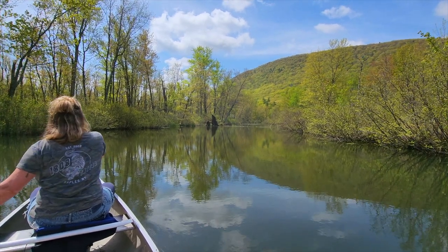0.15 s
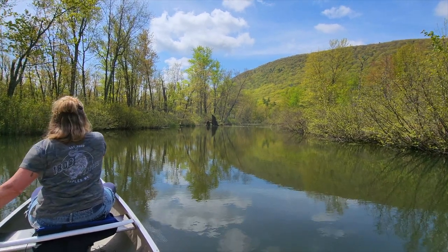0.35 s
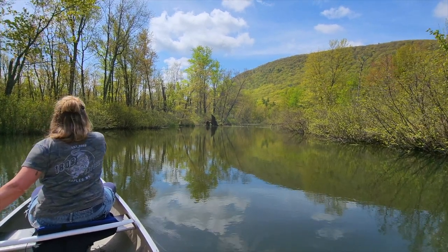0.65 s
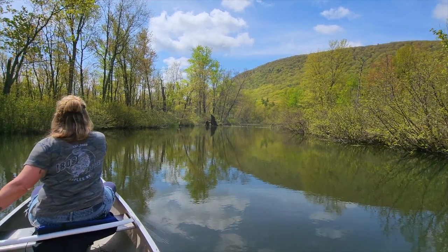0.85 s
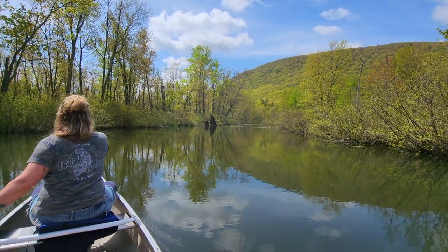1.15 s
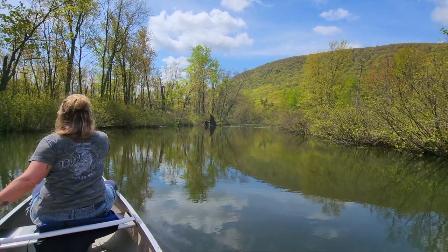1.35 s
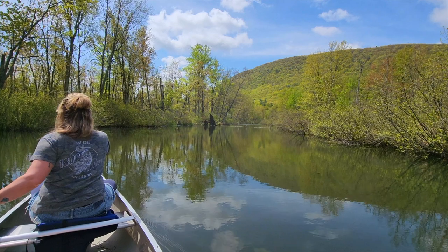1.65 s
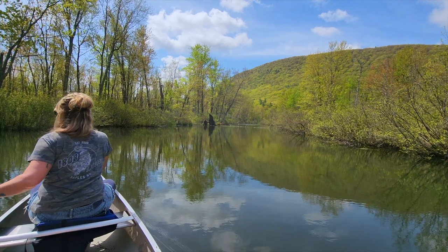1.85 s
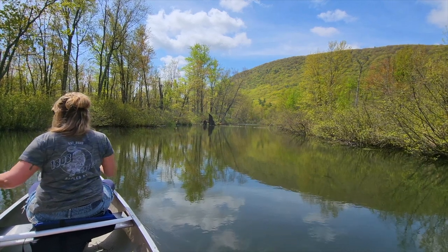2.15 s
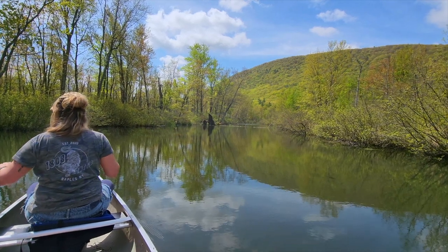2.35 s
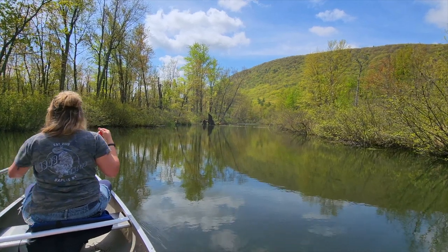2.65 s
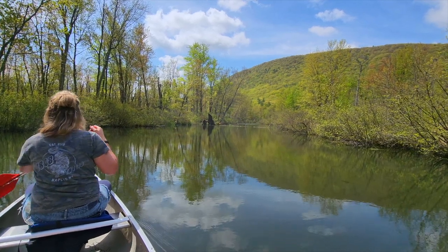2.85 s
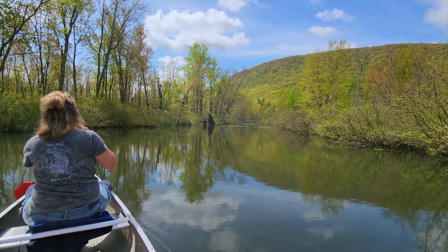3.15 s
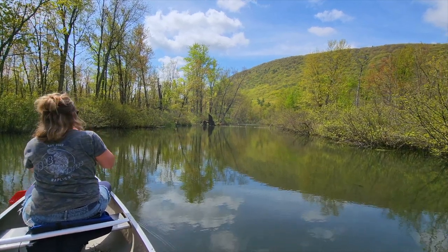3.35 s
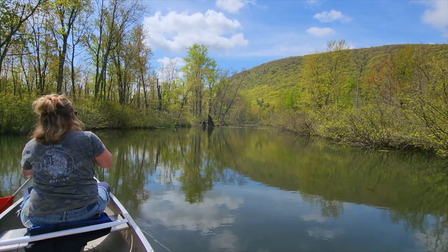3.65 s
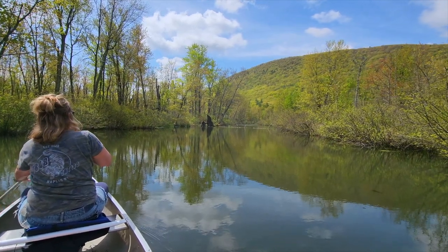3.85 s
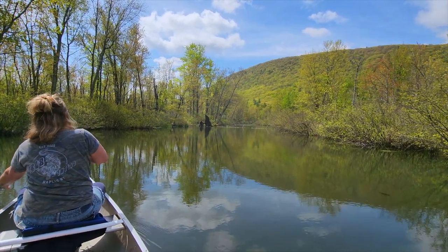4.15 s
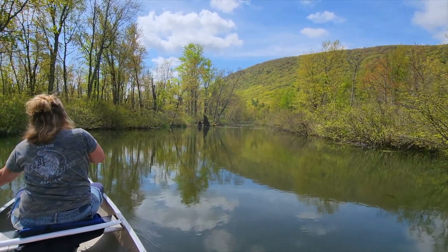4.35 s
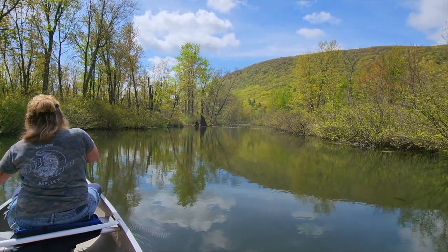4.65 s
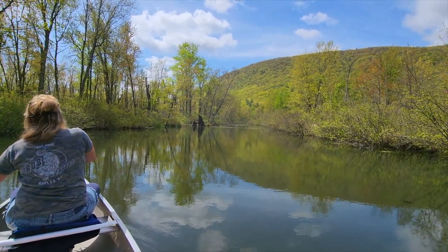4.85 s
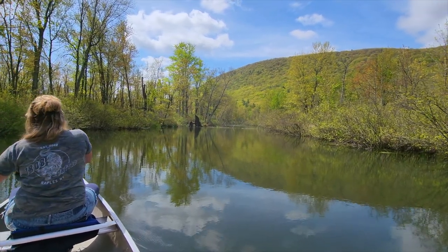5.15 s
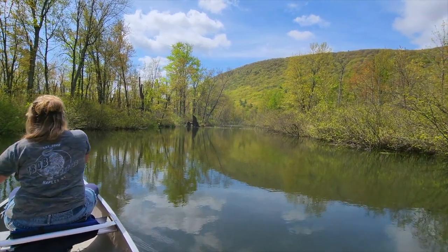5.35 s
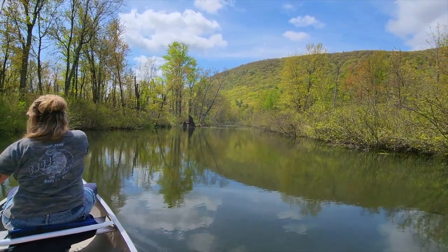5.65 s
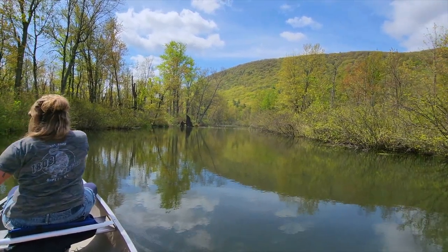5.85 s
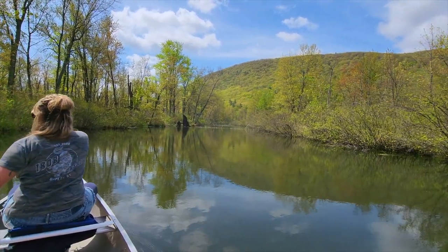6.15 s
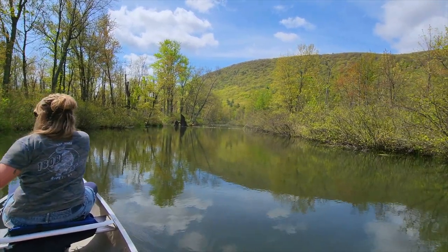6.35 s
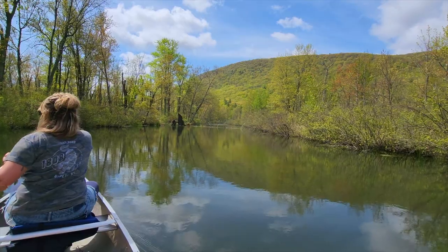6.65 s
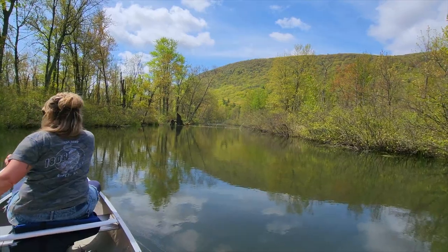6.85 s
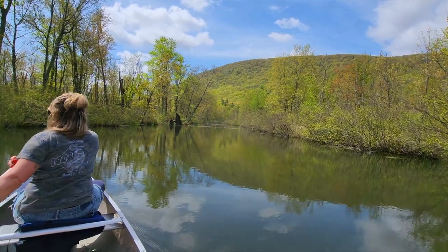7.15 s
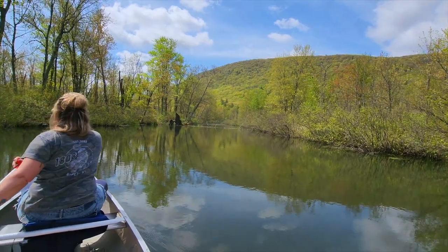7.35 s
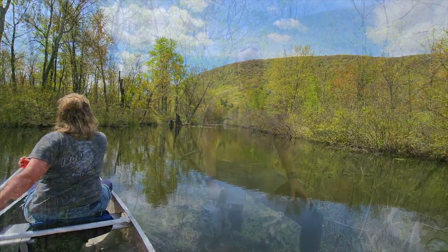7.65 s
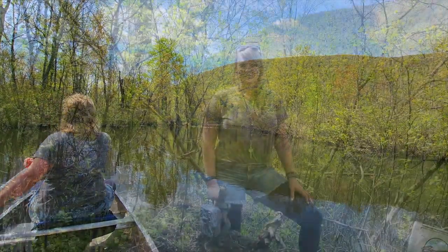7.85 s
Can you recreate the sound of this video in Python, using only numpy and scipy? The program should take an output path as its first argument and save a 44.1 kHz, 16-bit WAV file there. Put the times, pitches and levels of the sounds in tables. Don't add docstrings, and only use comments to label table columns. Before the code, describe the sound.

Outdoors on calm marsh water in a canoe. Faint distant whistles over soft leaf hush, then a close sparrow gives four sharp chips with thin high seeps, buzzes, rasps and a short trill. Water drips and paddle ticks follow. A blackbird trills and chucks, small birds chatter, and a warbler sings quick falling pairs. Low wind rumble swells and flutters on the open stereo microphone towards the end.

```python
import sys
import numpy as np
from scipy import signal
from scipy.fft import rfft, irfft, next_fast_len
from scipy.io import wavfile

SR = 44100
rng = np.random.default_rng(int(sys.argv[2]) if len(sys.argv) > 2 else 0)


def file_out(sig):
    cols = np.atleast_2d(sig).T
    lim = np.clip(cols, -1, 1)
    pcm = np.round(lim * 32767).astype(np.int16)
    wavfile.write(sys.argv[1], SR, pcm)


def voltage_ratio(decibels):
    exponent = np.asarray(decibels, float) / 20
    return 10 ** exponent


N = 353108


def rms_one(x):
    return x / np.sqrt(np.mean(x ** 2) + 1e-20)


def sides(pan_db):
    return voltage_ratio([[pan_db / 2], [-pan_db / 2]])


def in_time(rows):
    s, *columns = np.transpose(rows)
    return [np.interp(np.arange(N) / SR, s, c) for c in columns]


def at_hz(points, hz):
    point_hz, value = np.transpose(points)
    return np.interp(np.log(hz), np.log(point_hz), value)


def bandpass(x, order, low_hz, high_hz):
    return signal.sosfilt(signal.butter(order, [low_hz, high_hz], "band", fs=SR, output="sos"), x)


def drift(rate_hz):
    r = np.exp(-80 * np.pi * rate_hz / SR)
    white = rng.standard_normal(N // 40 + 2002)
    slow = signal.lfilter([1], [1, -2 * r, r * r], white)[2000:]
    return np.interp(np.arange(N) / 40, np.arange(len(slow)), rms_one(slow))


def add(track, s, sound):
    at = round(s * SR)
    track[..., at:at + sound.shape[-1]] += sound[..., :N - at]


def whistles(notes, edge=0.13, overtone_db=-62, rough=0.19, fade_db=0):
    out = np.zeros(N)
    for s, length_s, start_hz, mid_hz, end_hz, db in notes:
        u = np.linspace(0, 1, round(length_s * SR))
        hz = start_hz * (1 - u) * (1 - 2 * u) + 4 * mid_hz * u * (1 - u) + end_hz * u * (2 * u - 1)
        phase = 2 * np.pi * (np.cumsum(hz) / SR + rng.random())
        shape = signal.windows.tukey(len(u), np.clip(edge, .05, 1)) * voltage_ratio(fade_db * u)
        tone = np.sin(phase) + voltage_ratio(overtone_db) * np.sin(2 * phase)
        add(out, s, voltage_ratio(db + 3.5) * shape * tone)
    return out * (1 + rough * drift(99))


def trills(rows, per_s, duty, rough, uneven_db=-0.9, detuned=0.014):
    notes = []
    for s, end_s, start_hz, end_hz, db in rows:
        starts_s = np.arange(s, end_s, 1 / per_s)
        for at_s, (wobble, detune, late) in zip(starts_s, rng.standard_normal((len(starts_s), 3))):
            swell_db = -5 * ((at_s - s) / (end_s - s)) ** 3 - 7 * np.exp(-(at_s - s) / 0.0014)
            bend = 1 + detuned * detune
            pitches_hz = start_hz * bend, (start_hz + end_hz) / 2 * bend, end_hz * bend
            level_db = db + swell_db + uneven_db * wobble
            notes.append((at_s + .025 * late / per_s, duty / per_s, *pitches_hz, level_db))
    return whistles(notes, edge=0.45, rough=rough)


def glides(rows, early):
    return [(s, length_s, a, a + early * (b - a), b, db) for s, length_s, a, b, db in rows]


def held(rows, droop=0.95):
    return [(s, length_s, droop * hz, hz, droop * hz, db) for s, length_s, hz, db in rows]


def repeated(length_s, syllable, rows):
    return [(s, length_s, *syllable[:-1], syllable[-1] + db) for s, db in rows]


def sparrow():
    # chip t/s, strength/dB, seep f/Hz, seep length/s
    opening = [
        (1.312, -11, 7520, 0.11),
        (1.661, -3, 7330, 0.072),
        (1.897, -3, 7400, 0.0725),
        (2.127, -3.5, 7310, 0.07),
    ]
    # start f/Hz, middle f/Hz, end f/Hz, level/dB
    chip = (5250, 4680, 3550, -50)
    # start f/Hz, end f/Hz, level/dB
    burr = (2380, 2670, -65)
    # t/s, length/s, start f/Hz, end f/Hz, level/dB
    falls = [
        (2.688, .0086, 6500, 4470, -61),
        (2.748, .011, 5980, 4070, -54),
        (2.838, .015, 2770, 2180, -69),
    ]
    rises = [
        (2.52, 0.01, 5960, 6450, -69),
        (2.522, 0.017, 4610, 4820, -60.5),
        (2.525, 0.043, 2284, 2604, -63.5),
        (2.545, 0.02, 2410, 3170, -60),
        (2.559, 0.045, 3072, 3280, -64.5),
        (2.714, 0.017, 4730, 5870, -59.5),
        (2.806, 0.0068, 2250, 3080, -65.5),
    ]
    late_seeps = [
        (2.645, 0.027, 8330, 7480, -70),
        (2.666, 0.015, 7500, 7390, -59.5),
        (5.64, 0.03, 7900, 7450, -89),
    ]
    # t/s, length/s, f/Hz, level/dB
    level_notes = [
        (2.722, 0.034, 5860, -54.5),
        (2.75, 0.057, 5790, -56.5),
    ]
    far_seeps = [
        (6.035, .035, 7500, -77.5),
        (6.205, 0.038, 7570, -79),
        (6.375, .037, 7440, -80),
    ]
    # start t/s, end t/s, start f/Hz, end f/Hz, level/dB
    buzz_up = [
        (2.2455, 2.47, 4250, 5400, -57),
        (2.292, 2.46, 8700, 9500, -92),
    ]
    buzz_down = [
        (2.247, 2.44, 4200, 3450, -57.5),
    ]
    high_burr = [
        (2.606, 2.64, 5800, 6940, -67.5),
    ]
    rasp = [
        (2.9, 3.055, 4500, 5480, -57),
        (2.9, 3.02, 7600, 9400, -87.5),
        (2.902, 3.05, 3700, 4200, -67),
        (2.9, 3.06, 5100, 7500, -78),
    ]
    lower_rasp = [
        (2.898, 3.035, 3590, 3860, -60),
    ]
    closing = [
        (3.244, 3.43, 2560, 2380, -64),
    ]
    # t/s, length/s, start f/Hz, middle f/Hz, end f/Hz, level/dB
    big_fall = [
        (3.147, 0.013, 7700, 7180, 6470, -61),
        (3.156, 0.022, 6770, 5700, 3560, -51.5),
    ]

    chips = repeated(.013, chip, [(s, db) for s, db, *_ in opening])
    seeps = [(s + .033, length_s, 0.98 * hz, hz, hz, db - 51.5) for s, db, hz, length_s in opening]
    burrs = [(s - .096, s - .096 + .059, *burr) for s, *_ in opening]
    notes = glides(falls, early=.42) + glides(rises, early=0.59) + held(level_notes, droop=0.98)
    seeps = seeps + glides(late_seeps, early=0.8) + held(far_seeps)
    buzz_per_s, rasp_per_s = 64.1, 183
    buzz = trills(buzz_up, buzz_per_s, duty=0.34, rough=0.12, detuned=0.0082)
    buzz = buzz + trills(high_burr, 147, duty=0.34, rough=0.12, detuned=0.0082)
    return [(whistles(notes, edge=0.62, rough=0.37, overtone_db=-50), -6, -11, -3.5),
            (voltage_ratio(3) * whistles(chips, edge=0.79, rough=0.2, fade_db=-3.5), -6, -11, -4.5),
            (buzz, -6, -11, 0.3),
            (trills(buzz_down, buzz_per_s, duty=0.51, rough=0.13, detuned=0.0092), -4, -11, .6),
            (trills(rasp, rasp_per_s, duty=0.88, rough=0.14, detuned=0.026), -6, -11, -2.5),
            (whistles(big_fall, edge=0.51, rough=0.2), -5, -11, 1.5),
            (trills(lower_rasp, rasp_per_s, duty=0.98, rough=0.17, detuned=0.015), -4, -11, -6.0),
            (trills(closing, 70.8, duty=0.43, rough=0.16), -3, -11, -6),
            (whistles(seeps, edge=0.49), -8, -11, -1.5),
            (trills(burrs, 163, duty=0.96, rough=0.46), -3, -11, -6)]


def chucks(breath=1.0):
    # t/s, length/s, top f/Hz, level/dB
    calls = [
        (5.181, 0.041, 480, -55),
        (5.338, 0.034, 680, -54.5),
        (5.551, .031, 700, -54.5),
        (5.9, 0.038, 580, -56.5),
        (4.43, 0.03, 1200, -75),
    ]
    # f/Hz, level/dB
    throat = [(1700, -13), (2300, -3), (3000, -1.5), (3700, -4.5), (4400, 3), (5500, -2), (6300, -12),
              (6900, -25), (9000, -21), (10500, -51.5)]
    out = np.zeros(N)
    for s, length_s, top_hz, db in calls:
        u = np.linspace(0, 1, round(length_s * SR))
        phase = 2 * np.pi * np.cumsum(top_hz * (1 - 0.426 * (u - .4) ** 2)) / SR
        stack = 0
        for k in range(3, 18):
            stack = stack + voltage_ratio(at_hz(throat, k * top_hz)) * np.sin(k * phase + 6.28 * rng.random())
        rasp = np.convolve(rng.standard_normal(len(u)), np.hanning(40), "same")
        voice = rms_one(stack * (1 + breath * rms_one(rasp)))
        add(out, s, voltage_ratio(db) * np.hanning(len(u)) ** 0.17 * voice)
    return out


def blackbird():
    # t/s, length/s, start f/Hz, end f/Hz, level/dB
    slow_glides = [
        (4.162, 0.09, 2350, 2480, -77.5),
        (4.166, .15, 2667, 2746, -73.5),
        (4.47, 0.085, 1850, 1780, -71.5),
        (4.577, 0.028, 1530, 1380, -65),
        (4.72, 0.035, 3250, 3330, -82),
        (5.066, 0.3, 1745, 1890, -77),
        (5.637, 0.24, 1676, 1894, -77),
    ]
    # t/s, length/s, f/Hz, level/dB
    level_notes = [
        (4.206, .099, 1470, -83),
        (4.29, .3, 2720, -78),
        (4.687, .038, 1635, -81),
        (4.8, .72, 2740, -79),
    ]
    # start t/s, end t/s, start f/Hz, end f/Hz, level/dB
    trill = [
        (4.797, 5.6, 2816, 2645, -72),
        (4.797, 5.44, 3644, 2950, -77),
        (4.797, 5.44, 4100, 3500, -81.5),
        (4.797, 5.5, 4860, 4390, -76),
        (4.797, 5.5, 5580, 5060, -77.5),
        (4.7, 4.95, 2360, 2050, -78),
    ]
    gulp = [
        (4.626, 4.67, 2380, 2040, -56.5),
        (4.754, 4.783, 4200, 3270, -61),
        (4.754, 4.783, 4820, 4320, -57),
        (4.754, 4.772, 5500, 5070, -62),
    ]
    # t/s, length/s, start f/Hz, middle f/Hz, end f/Hz, level/dB
    arches = [
        (5.343, 0.02, 2600, 3085, 2600, -60.5),
        (5.553, 0.019, 2460, 2940, 2300, -63),
        (5.902, .022, 2350, 2840, 2253, -66),
    ]
    song = whistles(glides(slow_glides, early=.65) + held(level_notes), edge=0.2, rough=0.32)
    song = song + trills(trill, 66.7, duty=0.92, rough=0.27, uneven_db=1.0, detuned=.016)
    return [(song, 2.5, 14, .6),
            (trills(gulp, 170, duty=1.0, rough=0.26), 3, 14, -8),
            (chucks() + whistles(arches, edge=0.69, overtone_db=-13), 3, 14, -5)]


def warbler():
    # t/s, gap to fall/s, hook strength/dB, fall strength/dB
    pairs = [
        (6.062, 0.026, -4.5, -2.5),
        (6.232, 0.044, -1.5, -0.5),
        (6.404, 0.038, -1.5, -0.5),
        (6.572, 0.038, -0.5, -3),
    ]
    # start f/Hz, middle f/Hz, end f/Hz, level/dB
    hook = (5300, 3700.5, 4599, -66.5)
    fall = (4449, 3099, 2149, -67)
    # t/s, length/s, start f/Hz, end f/Hz, level/dB
    ending = [
        (6.751, 0.012, 5600, 4570, -69),
        (6.761, 0.015, 3730, 2880, -67.5),
        (6.882, 0.017, 5700, 5000, -74.5),
        (6.898, 0.017, 4000, 2900, -67.5),
        (7.006, 0.034, 2920, 4420, -68.5),
        (7.036, 0.017, 4290, 2830, -66),
    ]
    # t/s, length/s, f/Hz, level/dB
    dots = [
        (6.066, .014, 2530, -67.5),
        (6.134, 0.013, 2550, -60),
    ]
    notes = repeated(.026, hook, [(s, db) for s, _, db, _ in pairs])
    notes += repeated(.056, fall, [(s + gap_s, db) for s, gap_s, _, db in pairs])
    song = whistles(notes, edge=0.64, rough=0.5)
    echo_s, echo_db = .011, -5
    return [(whistles(held(dots), edge=0.6), 0.5, -24, -14),
            (whistles(glides(ending, early=0.53), edge=0.38, rough=0.3), 0.5, -24, -7),
            (song + voltage_ratio(echo_db) * np.roll(song, round(echo_s * SR)), 0.5, -24, -4)]


def far_birds():
    # start f/Hz, middle f/Hz, end f/Hz, level/dB
    slur = (7253, 6296, 4598, -70.5)
    slur_strengths_db = [0, 1.5, 4, 2, 0.5, 0.5]
    # start t/s, end t/s, start f/Hz, end f/Hz, level/dB
    chatter = [
        (5.6, 5.71, 4950, 4050, -73),
        (5.76, 5.9, 5200, 4150, -69.5),
        (5.94, 6.07, 5600, 3770, -70),
    ]
    # t/s, length/s, start f/Hz, end f/Hz, level/dB
    slides = [
        (4.14, .035, 5950, 6950, -72),
        (4.553, .035, 6250, 6980, -71),
        (4.588, .09, 7050, 6650, -81),
        (5.272, .15, 4590, 4520, -61),
        (5.41, .055, 4520, 4500, -67),
        (5.864, .026, 4780, 5900, -77),
    ]
    # t/s, length/s, f/Hz, level/dB; the 2.53 s and 2.59 s rows carry on the sparrow's rises
    faint_held = [(.43, .02, 2500, -80), (2.59, 0.2, 3150, -73.5), (2.9, .12, 2620, -78),
                  (6.42, 0.039, 4580, -77), (6.549, 0.04, 2940, -78), (6.598, .1, 4600, -80),
                  (6.8, 0.032, 2300, -77), (6.92, .06, 2300, -73), (7.028, .05, 4343, -74),
                  (7.07, 0.14, 4330, -79), (2.53, .07, 4350, -71), (7.72, 0.26, 3650, -92),
                  (7.915, .015, 2050, -73)]
    # t/s, length/s, start f/Hz, middle f/Hz, end f/Hz, level/dB
    faint_bends = [(.04, 0.065, 3820, 3870, 3880, -80), (.115, 0.11, 3780, 3660, 3660, -80),
                   (0.22, .045, 3300, 3700, 3800, -82), (.02, .1, 3900, 4200, 4100, -86),
                   (.265, .03, 4500, 4000, 4540, -83), (1.14, .15, 4150, 4030, 3960, -84),
                   (1.5, .035, 4700, 3700, 4170, -78), (1.44, 0.1, 3900, 3600, 3530, -80.5),
                   (4.592, .006, 4700, 4400, 4300, -75), (4.449, .01, 3300, 3500, 4300, -74),
                   (1.53, 0.12, 4000, 3760, 3560, -77.5), (1.9, 0.18, 3300, 3800, 3510, -81),
                   (5.712, 0.027, 5900, 7200, 4400, -67), (6.1, .012, 4200, 4120, 4600, -67),
                   (5.95, .028, 4500, 5250, 5600, -71), (5.785, 0.011, 5200, 7000, 7300, -81)]
    first_s, every_s = 4.685, .0983
    slurs = repeated(.013, slur, [(first_s + k * every_s, db) for k, db in enumerate(slur_strengths_db)])
    faint = held(faint_held, droop=0.94) + faint_bends
    return [(voltage_ratio(7) * whistles(slurs, edge=0.6, rough=0.3, fade_db=-10), 3, 10, -9),
            (trills(chatter, 95, duty=0.6, rough=0.3, uneven_db=1.0, detuned=.04), -1.5, 14, 1.5),
            (whistles(glides(slides, early=.8), edge=0.36, rough=0.2), 3, 10, -7),
            (voltage_ratio(-2.0) * whistles(faint, edge=0.35, rough=0.65), 0.5, 10, -2.5)]


def chorus():
    # t/s, level/dB
    swell = [(4.7, -99), (4.85, -76.5), (5.55, -68), (5.75, -64.5), (6.1, -68), (6.6, -69.5), (7.3, -78),
             (7.6, -81), (7.75, -102)]
    when, pitch, strength = rng.random((500, 3)).T
    top_hz = 3900 + 1900 * pitch
    length_s = np.full(500, .02)
    notes = np.column_stack([4.7 + 3.1 * when, length_s, top_hz, top_hz - 300, top_hz - 700, 8 * strength])
    return voltage_ratio(in_time(swell)[0] - 5.5) * rms_one(whistles(notes, edge=0.95)) * np.sqrt(3.1 * SR / N)


def hidden_birds():
    # t/s, length/s, start f/Hz, end f/Hz, level/dB
    rows = [
        (0.0, 0.018, 4620, 3310, -73.5),
        (.12, .02, 4500, 3190, -72),
        (.26, 0.021, 4730, 3290, -76),
        (1.2, .02, 3590, 2880, -74.5),
        (1.45, .02, 4300, 3070, -77),
        (1.56, 0.021, 4200, 3180, -74),
        (1.32, .03, 5000, 3900, -69),
        (5.6, 0.032, 4050, 5700, -66.5),
        (5.68, .03, 5900, 4030, -65),
    ]
    return whistles(glides(rows, early=.5), edge=0.5)


def banks(x):
    # f/Hz, level/dB
    scatter = [(1500, -1), (2500, -0.5), (3500, 2.5), (5000, 1.5), (8000, -0.5)]
    # f/Hz, T60/s
    decay = [(1500, 1.6), (3000, 1.13), (5000, 0.94), (8000, 1.07)]
    t, response = np.arange(SR) / SR, 0
    white = rng.standard_normal((2, SR))
    edges_hz = 1000 * 2 ** np.arange(0, 4.1, .5)
    for low_hz, high_hz in zip(edges_hz, edges_hz[1:]):
        hz = np.sqrt(low_hz * high_hz)
        gain = voltage_ratio(at_hz(scatter, hz) - 60 * t / at_hz(decay, hz))
        response = response + bandpass(white, 2, low_hz, high_hz) * gain
    burst, far_bank = 1.1 * np.exp(-t / 0.02), 0.077 * np.exp(-((t - .09) / 0.043) ** 2)
    response = response * (1 - np.exp(-t / 0.002)) * (1 + burst + far_bank)
    response = response / np.sqrt(np.sum(response ** 2) / 2)
    sway_s, sway_rate_hz = 4e-5, 25
    x = np.interp(np.arange(N) + sway_s * SR * drift(sway_rate_hz), np.arange(N), x)
    return signal.fftconvolve(x[None], response * sides(-0.6), axes=1)[:, :N]


def birds():
    direct = np.zeros((2, N))
    scattered = chorus() + hidden_birds()
    for song, pan_db, lag, wet_db in sparrow() + blackbird() + warbler() + far_birds():
        direct += sides(pan_db) * [np.roll(song, lag), song] / np.sqrt(2)
        scattered += voltage_ratio(wet_db) * song
    return direct + banks(scattered) / np.sqrt(2)


def drops(cycles=38, rise=0.0035):
    # t/s, peak level/dB, f/Hz, left-right/dB
    rows = [(0.079, -61, 1980, -7), (0.688, -71, 5300, -22), (3.1899, -40, 2500, -8),
            (3.1939, -45, 2900, -8), (3.2023, -48.5, 2570, 9), (3.1905, -68, 8500, 18),
            (3.207, -64, 8300, 18), (2.9, -69, 7900, 9), (6.128, -66, 1950, -2), (6.748, -68, 2100, -5),
            (6.021, -68, 7300, 5), (4.446, -48.5, 2230, -6), (6.189, -54, 2230, -6),
            (6.272, -64.5, 2000, -3), (6.336, -60, 2140, -6.0), (6.4536, -59, 2060, -2.5),
            (7.1724, -62, 1760, -11), (7.19, -67, 1650, -12), (7.5966, -74.5, 1900, -14),
            (7.7815, -65.5, 4870, -25)]
    out, t = np.zeros((2, N)), np.arange(SR // 20) / SR
    for s, db, hz, pan_db in rows:
        decay = voltage_ratio(-60 * t * hz / cycles) * (1 - np.exp(-t * hz * 2.1)) ** 2
        ring = decay * np.sin(2 * np.pi * hz * t * (1 + rise * t * hz))
        add(out, s, voltage_ratio(db) * ring / np.max(decay) * sides(pan_db))
    return out


def ticks(rows, low_hz, high_hz, lift_db, t60_s=0.008):
    out, t = np.zeros((2, N)), np.arange(SR // 40) / SR
    for s, db, pan_db in rows:
        snap = rng.standard_normal(len(t)) * voltage_ratio(-60 * t / t60_s)
        add(out, s, voltage_ratio(db + lift_db) * snap * sides(pan_db))
    return bandpass(out, 2, low_hz, high_hz)


def hull():
    # t/s, peak level/dB, left-right/dB
    dry_ticks = [(1.3179, -88, -5), (1.8826, -89, 8), (2.2147, -86, 8), (2.362, -76, 11), (2.369, -62.5, 9),
                 (2.4043, -80, 5.5), (2.534, -82, 4), (2.4369, -72, 5), (2.4676, -62.5, 14),
                 (2.5005, -80, 10.5), (2.5688, -72, 19), (2.6, -75, 14), (2.6673, -74, 14),
                 (2.685, -76, 13), (3.035, -75, -12), (3.19, -68, 18), (3.205, -66, 21), (3.2194, -74, 13),
                 (3.4411, -82, 3), (3.7244, -87, 14), (4.4463, -73, 13), (4.5572, -84, 5.5),
                 (5.999, -81, 0), (6.0344, -92, 5), (6.9303, -76, 11), (7.2927, -87, 3), (7.4475, -79, -4),
                 (7.4889, -87, -8), (7.5378, -82, -9), (7.5613, -78, -7), (7.6344, -79, 2),
                 (7.6844, -82, -11)]
    dull_ticks = [(4.5924, -69, -4.5), (5.9985, -58, -12), (6.0344, -63, -7.0), (6.9292, -60, -14.5),
                  (7.1514, -67, -8.0), (7.2914, -69, -9.5), (7.4014, -72, -10.5), (7.4889, -68, -10),
                  (7.5616, -68, -10), (7.598, -66.5, -19), (7.6644, -68, -11), (7.8394, -79, -7.5)]
    bright = ticks(dry_ticks, 7000, 9200, lift_db=6.5) + ticks(dry_ticks, 11000, 15000, lift_db=-8)
    return bright + ticks(dull_ticks, 3800, 6630, lift_db=4.0)


def high_grains():
    # t/s, level/dB
    grain_level = [(2.1, -125), (2.2, -100), (2.45, -97), (2.7, -104), (3.0, -102), (3.2, -101), (3.35, -125)]
    grains_per_s = 500
    struck = rng.random((2, N)) < grains_per_s / SR
    size = voltage_ratio(2.5 * np.minimum(rng.exponential(1, N), 4))
    grains = struck * size * rng.choice([-1, 1], N)
    bright = bandpass(grains + 1e-18, 3, 9000, 15500)
    return voltage_ratio(in_time(grain_level)[0]) * rms_one(bright) * sides(6)


def banded_noise(spectrum, alike, patchy_db, flicker_hz):
    out, together = 0, drift(flicker_hz / 3)
    first_hz, last_hz = spectrum[0][0], spectrum[-1][0]
    edges_hz = first_hz * 2 ** np.arange(0, np.log2(last_hz / first_hz) + .3, .5)
    white = rng.standard_normal((2, 2, N))
    for k, (low_hz, high_hz) in enumerate(zip(edges_hz, edges_hz[1:])):
        mid, side = bandpass(white[k % 2], 2, low_hz, high_hz)
        hz = np.sqrt(low_hz * high_hz)
        share = np.clip(at_hz(alike, hz), -.99, .99)
        gain = voltage_ratio(at_hz(spectrum, hz) + patchy_db * (0.89 * together + drift(flicker_hz)))
        out = out + gain * (np.sqrt(1 + share) * mid + np.sqrt(1 - share) * side * [[1], [-1]])
    return rms_one(out)


def wind():
    # t/s, level under 160 Hz/dB, left-right/dB
    gusts = [(0, -57.5, 3), (.55, -58.5, 3.5), (.92, -50, 8), (1.3, -60, 2), (1.75, -68, -0.5),
             (3.45, -69, 1), (3.95, -58, 3.5), (4.4, -67, -2.5), (5.0, -61, 1), (5.45, -62, 2.5),
             (5.72, -57.5, -0.5), (5.95, -47.5, -1), (6.35, -51.5, -1), (6.85, -49, -2.3), (7.6, -45, -1),
             (8.01, -56.5, 2)]
    # t/s, rise/dB
    buffets = [(.31, 8), (.49, 7.5), (5.061, 9), (5.79, 5), (6.37, -6.5), (6.92, -4), (7.14, -3.5),
               (7.3, -5.5), (7.56, 0.5), (5.91, 6.5), (6.019, 10), (6.141, 2), (6.201, 4), (6.49, 9.5),
               (6.59, 1), (6.739, 5), (6.858, 8), (6.97, 8), (7.05, 5.5), (7.2, 8.5), (7.39, 3),
               (7.509, -2), (7.631, 1), (7.8, 5.5), (7.921, 3.5)]
    # f/Hz, level per Hz/dB
    rumble_spectrum = [(20, -15), (35, 1), (55, 7), (85, 4), (115, -4), (160, -11.5), (230, -34)]
    flutter_spectrum = [(150, 4), (220, -3.5), (320, -26), (450, -43), (620, -58)]
    # f/Hz, likeness/1
    likeness = [(25, .78), (60, .62), (160, .2)]
    # t/s, peak level/dB
    cover_flaps = [(5.902, -53), (5.998, -50), (6.094, -47), (6.418, -53), (6.48, -47.5), (6.54, -58),
                   (6.727, -56), (6.797, -54), (6.856, -61), (6.946, -49.5), (6.973, -53), (7.054, -52.5),
                   (7.143, -58), (7.203, -51), (7.251, -51), (7.333, -60), (7.381, -56), (7.45, -56),
                   (7.534, -55), (7.568, -50), (7.619, -58), (7.696, -60), (7.762, -57), (7.801, -60),
                   (6.12, -44),
        (6.155, -49.5),
        (6.2, -52),
        (6.24, -54),
    ]

    low_db, pan_db = in_time(gusts)
    bright = voltage_ratio(0.71 * (low_db + 46) + 7)
    t, buffet_s = np.arange(N) / SR, 0.036
    low_db = low_db + sum(db * np.exp(-((t - s) / buffet_s) ** 2) for s, db in buffets)
    low = banded_noise(rumble_spectrum, likeness, patchy_db=1.0, flicker_hz=13)
    flutter = banded_noise(flutter_spectrum, [(150, 0.15), (600, 0.072)], patchy_db=3.0, flicker_hz=33)
    gust = signal.sosfilt(signal.butter(2, 330, fs=SR, output="sos"), low + voltage_ratio(-26.5) * flutter)
    deep = signal.sosfiltfilt(signal.butter(2, 70, fs=SR, output="sos"), gust)
    upper = (gust - deep) * sides(-1.4)
    flaps, flap_s = np.zeros(N), 0.046
    for s, db in cover_flaps:
        add(flaps, s - flap_s / 4, voltage_ratio(db - 4.5) * np.hanning(round(flap_s * SR)))
    turbulence = voltage_ratio(low_db) * (deep + bright * upper) + flaps * flutter
    return turbulence * voltage_ratio([pan_db / 2, -pan_db / 2])


def hush():
    # f/Hz, level per Hz/dB
    spectrum = [(45, -15.5), (105, -1.5), (165, -10), (240, -8.5), (454, -22), (755, -13), (982, -27),
                (1390, -16), (1780, -27.5), (2200, -24), (3230, -37.5), (5460, -30), (6280, -44),
                (7890, -37), (10300, -76), (17400, -120)]
    # t/s, level/dB
    level = [(0.0, -76), (2.72, -75.5), (6.13, -75.5), (7.45, -76), (8.01, -78.5)]
    # f/Hz, likeness/1
    likeness = [(60, 0.8), (160, 1), (410, 0.78), (1080, 0.093), (2840, 0.048), (7440, 0.53)]
    air = banded_noise(spectrum, likeness, patchy_db=1.0, flicker_hz=2.3)
    air = voltage_ratio(in_time(level)[0] + 8.5) * air
    return signal.sosfilt(signal.butter(2, 7500, fs=SR, output="sos"), air)


def ports(x):
    # f/Hz, left-right/dB
    tilt = [(300, 0), (600, 2.0), (1500, 2.0), (2600, -8), (3800, -6), (5200, -9.5), (7400, -4.5),
            (9500, 3.5)]
    size = next_fast_len(N)
    tilt_db = at_hz(tilt, np.maximum(np.fft.rfftfreq(size, 1 / SR), 1))
    return irfft(rfft(x, size) * voltage_ratio([tilt_db / 2, -tilt_db / 2]), size)[:, :N]


def scene():
    water = drops() + hull() + high_grains()
    self_noise = voltage_ratio(-103) * rng.standard_normal((2, N))
    return ports(birds() + hush()) + water + wind() + self_noise


def top_cut(x):
    return signal.sosfilt(signal.butter(12, 15800, fs=SR, output="sos"), x)


def record(dry):
    return top_cut(dry)


dry = scene()
out = record(dry)
file_out(out)
```